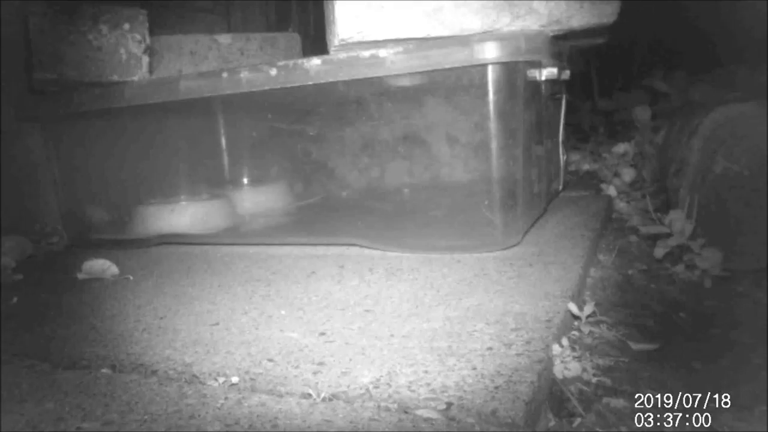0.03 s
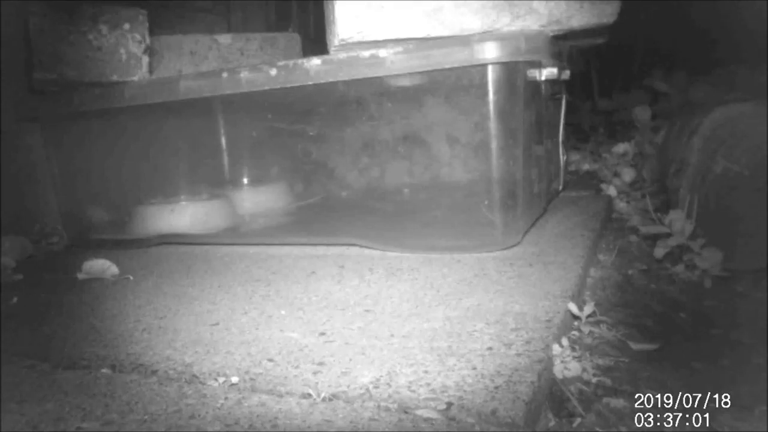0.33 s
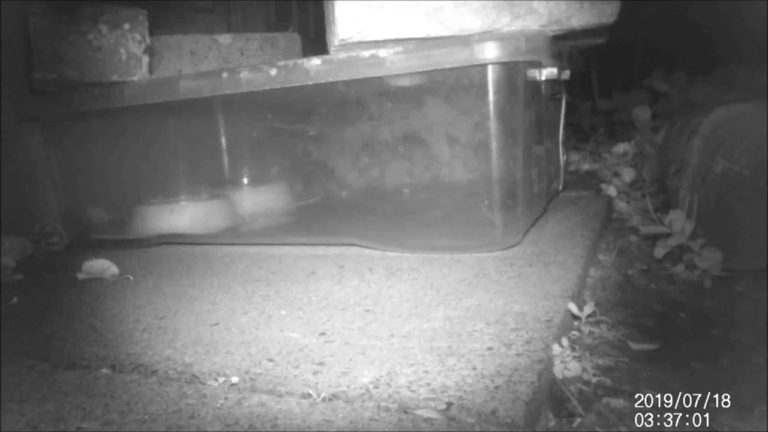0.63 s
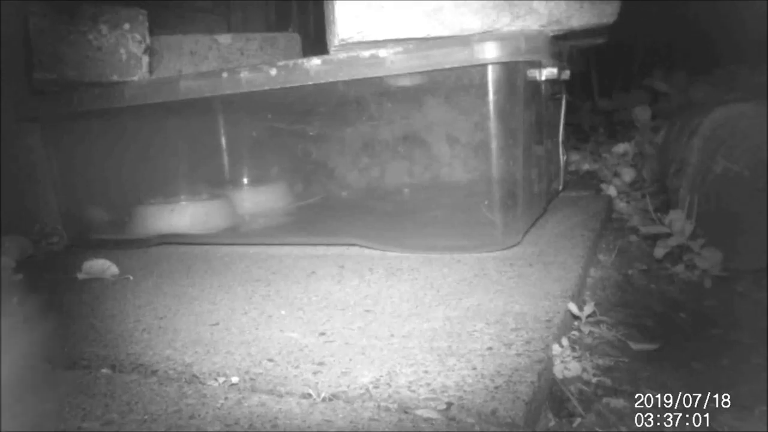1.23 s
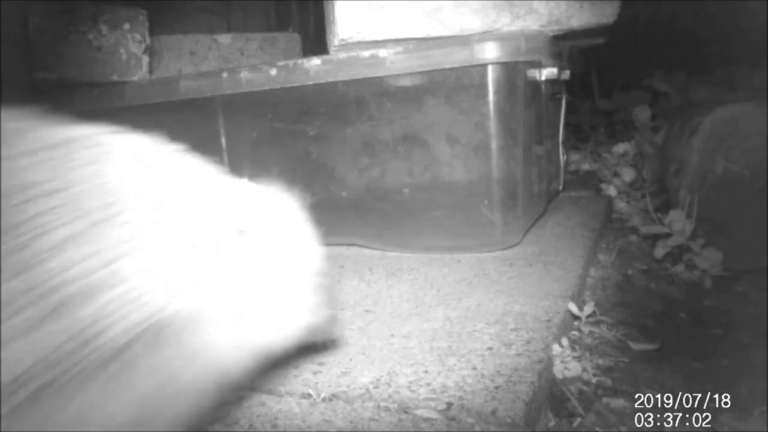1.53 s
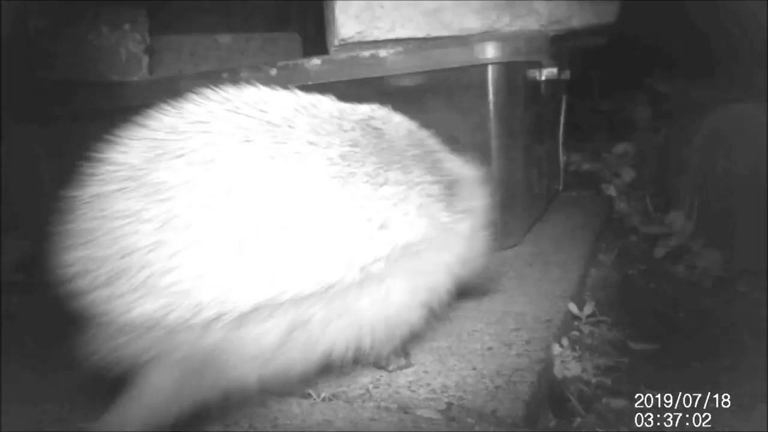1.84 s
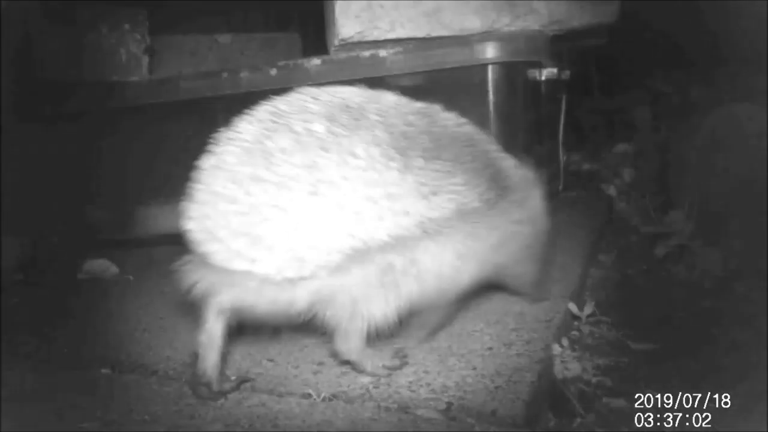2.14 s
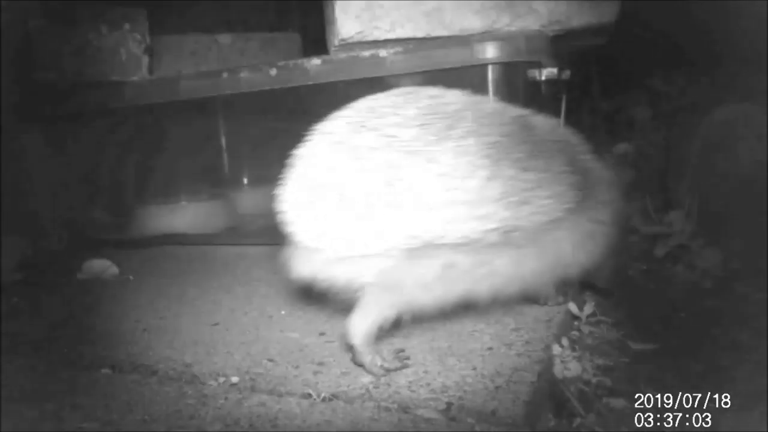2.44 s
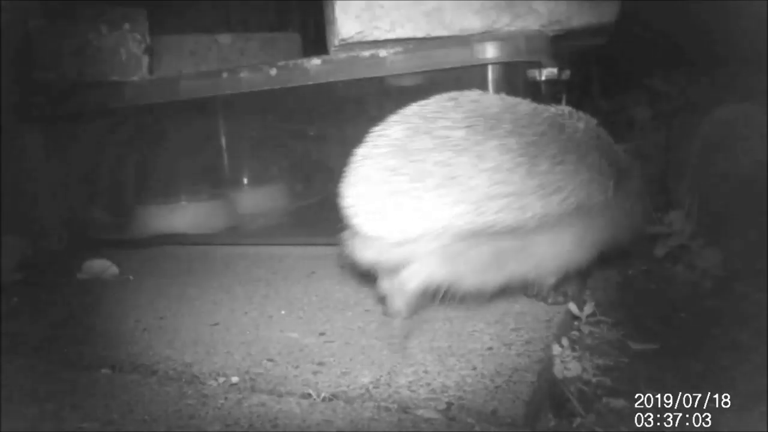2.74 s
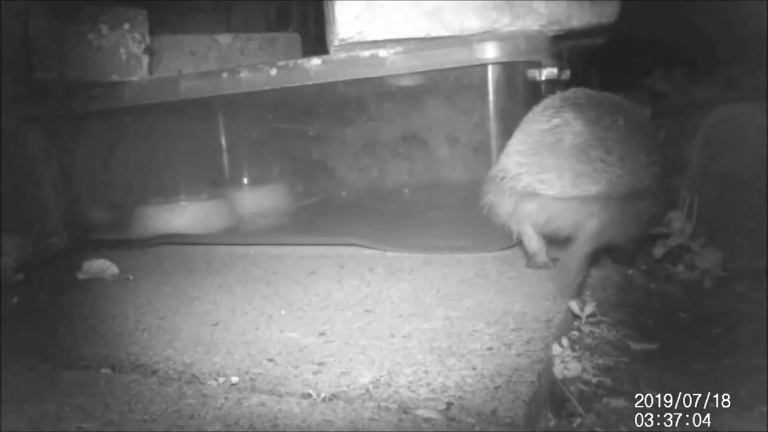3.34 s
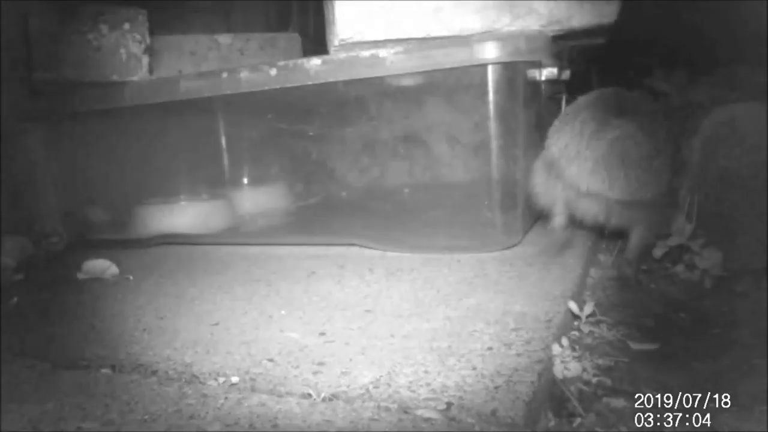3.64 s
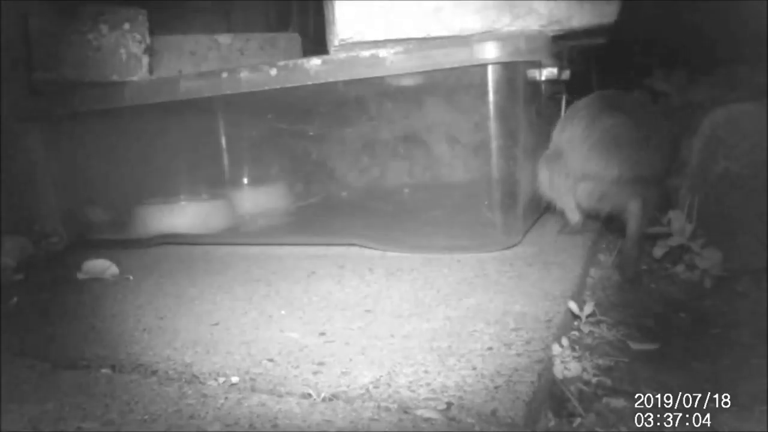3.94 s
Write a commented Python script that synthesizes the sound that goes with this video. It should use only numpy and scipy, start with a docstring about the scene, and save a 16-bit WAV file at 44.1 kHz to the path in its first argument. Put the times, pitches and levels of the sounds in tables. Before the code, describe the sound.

One click, then a quiet, dull hiss over a faint low hum.

```python
"""A quiet garden at night, heard through a camera's microphone.
After a moment of silence the sound input switches on: its signal jumps from zero to a
constant offset, and that jump makes one click. Then there is only the steady hiss of the
microphone amplifier over a faint low rumble. The input lets little treble through."""
import sys
import numpy as np
from scipy import signal
from scipy.fft import rfft, irfft
from scipy.io import wavfile

SR = 44100
rng = np.random.default_rng(int(sys.argv[2]) if len(sys.argv) > 2 else 0)


def generate_wav(signal):
    """Clip the signal to [-1, 1] and save it as 16-bit WAV at the path in sys.argv[1]."""
    frames = np.transpose(np.atleast_2d(signal))
    scaled = np.clip(frames, -1, 1) * 32767
    pcm = np.round(scaled).astype(np.int16)
    wavfile.write(sys.argv[1], SR, pcm)


N = 176400  # 4 seconds

HISS_DB = -48
# The tone of the hiss, stronger at low pitches (frequency [Hz], relative level [dB])
HISS_TONE = [(4, -6.5), (14, 2), (25, 2), (36, 0.5), (70, 1), (95, -2.5), (150, -2.5), (270, -4.5),
             (500, -7.5), (1000, -11.5), (1800, -14.5), (3500, -17), (5000, -17.5)]

def amplifier_hiss():
    """The amplifier's own noise: flicker noise in the bass, even noise from heat in the treble."""
    hz, db = np.array(HISS_TONE).T
    return noise(lambda f: undb(np.interp(np.log(f), np.log(hz), db)), HISS_DB)


SWITCH_ON_S, OFFSET_DB = .06964, -24.45

def switch_on(sound):
    """The input jumps from silence to the sound plus a constant offset, which clicks once."""
    is_on = np.arange(N) / SR >= SWITCH_ON_S
    return is_on * (sound + undb(OFFSET_DB))


# The two deep hums in the rumble (pitch [Hz], width [Hz], level [dB])
RUMBLE_BANDS = [(47, 5.6, -56.5), (111, 6, -67.5)]

def rumble():
    """A faint, wavering drone: noise that rings around two low pitches."""
    return sum(noise(lambda f: 1 / np.hypot(1, (f / hz - hz / f) * hz / width), db)
               for hz, width, db in RUMBLE_BANDS)


# How far the input turns down the treble (frequency [Hz], gain [dB])
TREBLE_CUT = [(4850, 0), (5000, -1.3), (5150, -4), (5350, -11), (5500, -20), (5650, -33), (5800, -49),
              (16000, -48)]

def narrow_input(sound):
    """The input passes little above 5 kHz, which dulls the hiss."""
    hz, db = np.array(TREBLE_CUT).T
    return filtered(sound, lambda f: undb(np.interp(f, hz, db)))


def undb(db):
    """Turns decibels into a number to multiply by."""
    return 10 ** (np.asarray(db) / 20)


def filtered(sound, gain):
    """Turns each frequency up or down by gain(Hz)."""
    hz = np.maximum(np.arange(N // 2 + 1) * SR / N, 1)
    return irfft(rfft(sound) * gain(hz), N)


def noise(gain, db):
    """Steady noise with its tone set by gain(Hz) and its average (rms) level by db."""
    shaped = filtered(rng.standard_normal(N), gain)
    return shaped * undb(db) / np.std(shaped)


def scene():
    """Hiss and rumble together in one channel."""
    return (amplifier_hiss() + rumble())[None]


def record(dry):
    """Dulls the sound, switches it on with a click, then trims the very highest treble."""
    switched = switch_on(narrow_input(dry))
    low_pass = signal.firwin(101, cutoff=16000, fs=SR)
    return signal.convolve(switched, low_pass[None], mode="same")


dry = scene()
out = record(dry)
generate_wav(out)
```